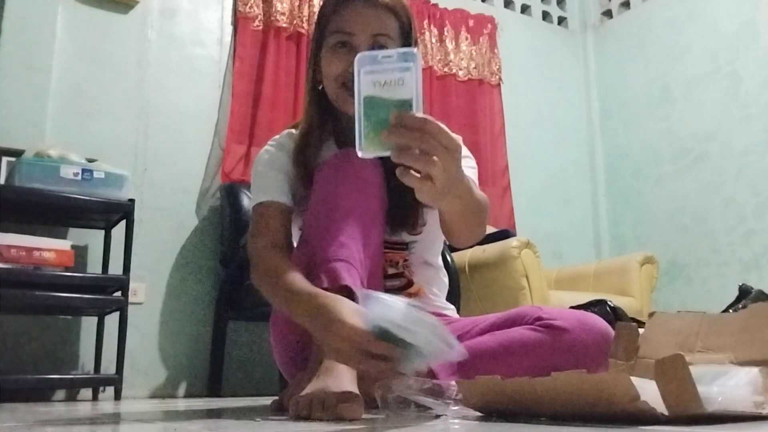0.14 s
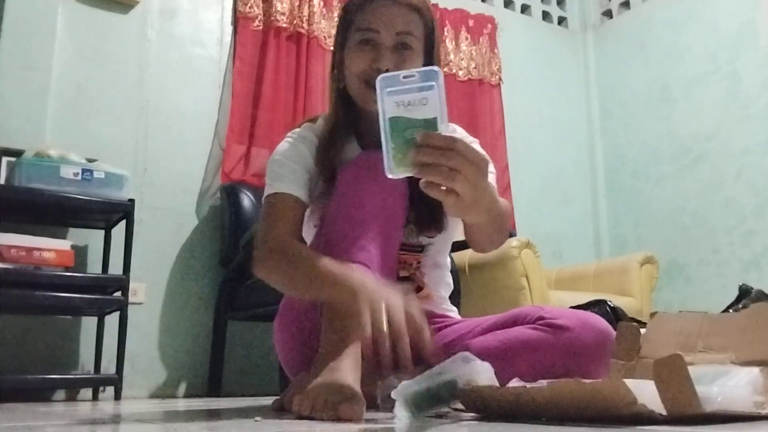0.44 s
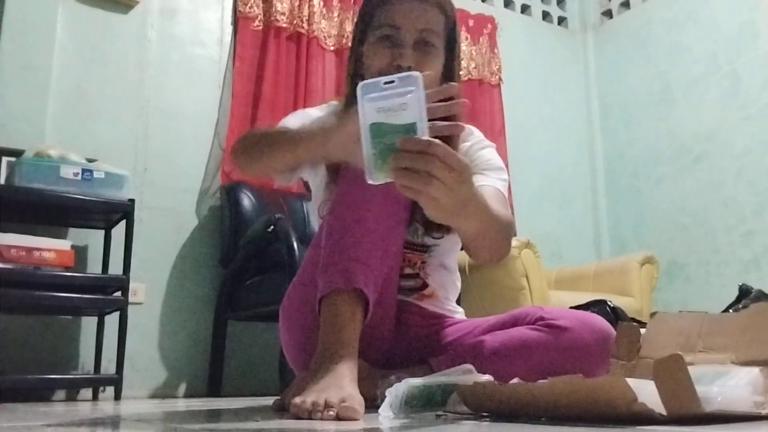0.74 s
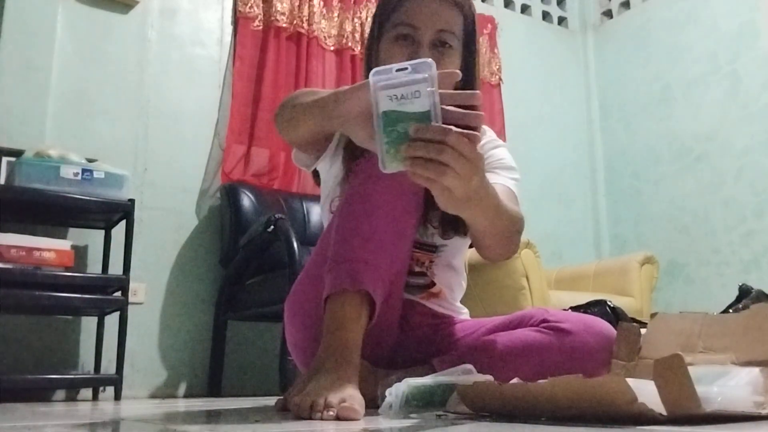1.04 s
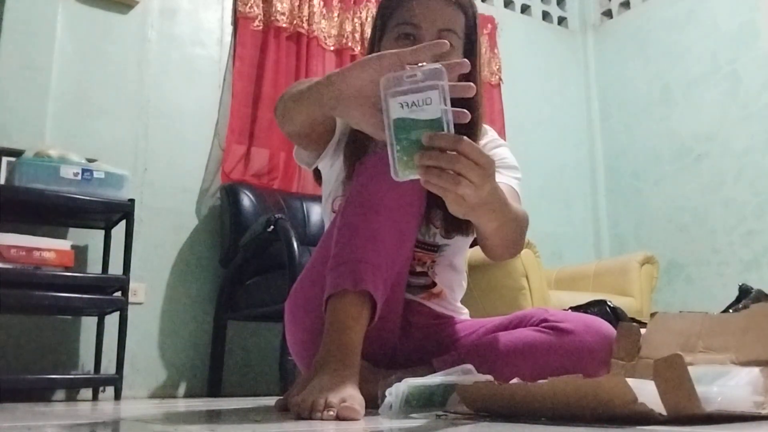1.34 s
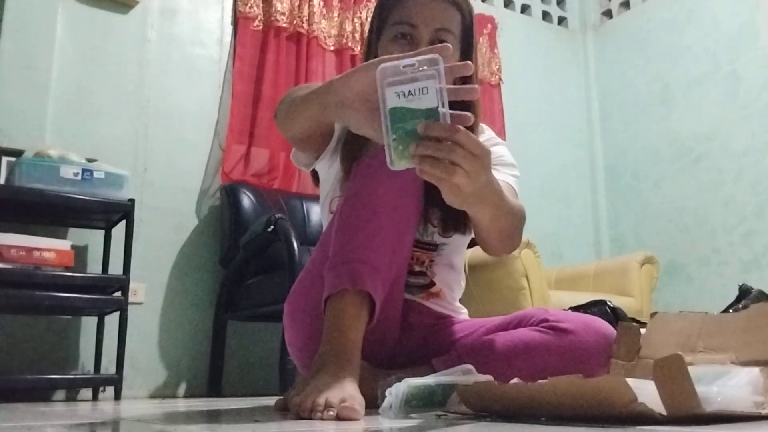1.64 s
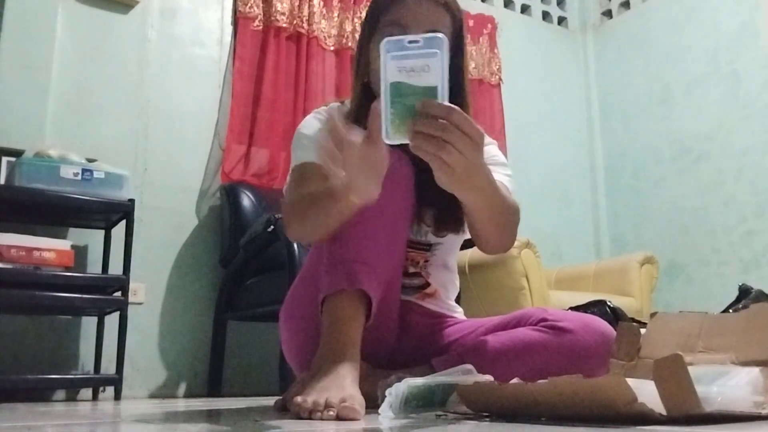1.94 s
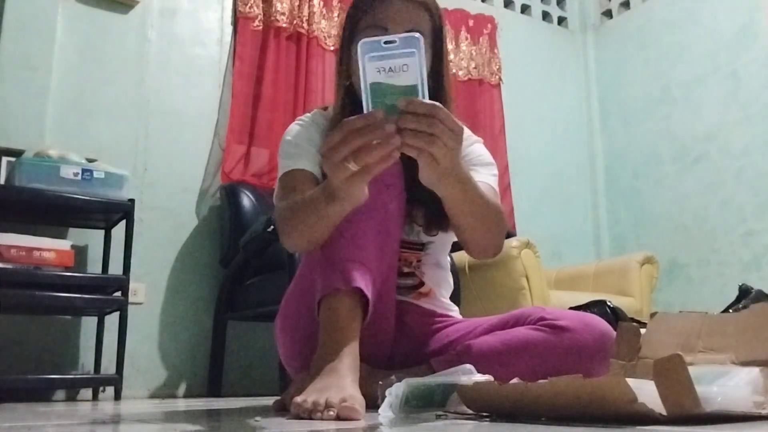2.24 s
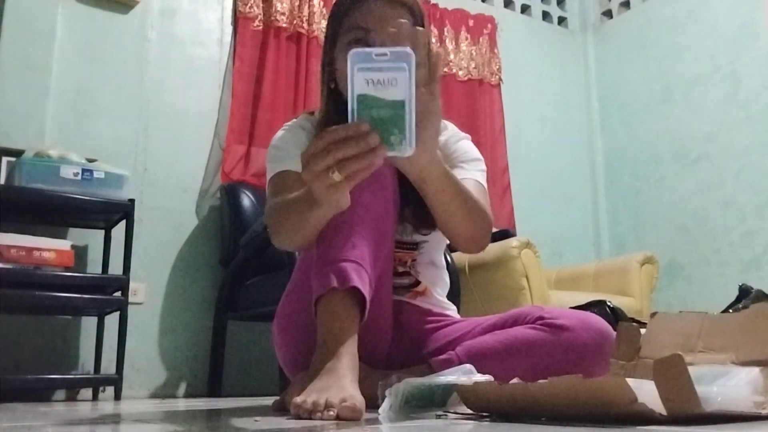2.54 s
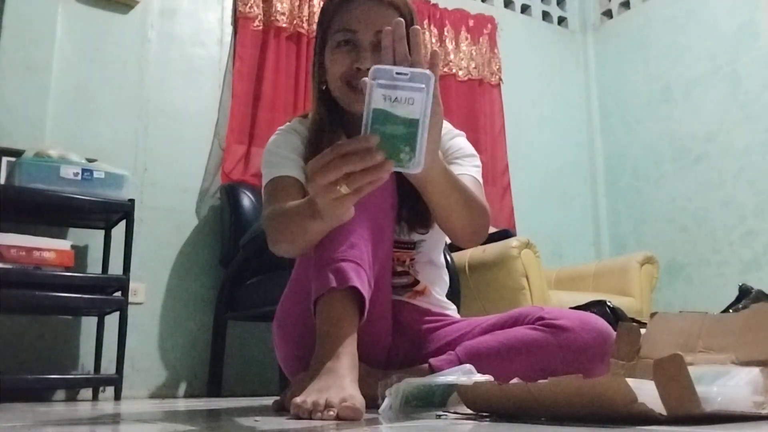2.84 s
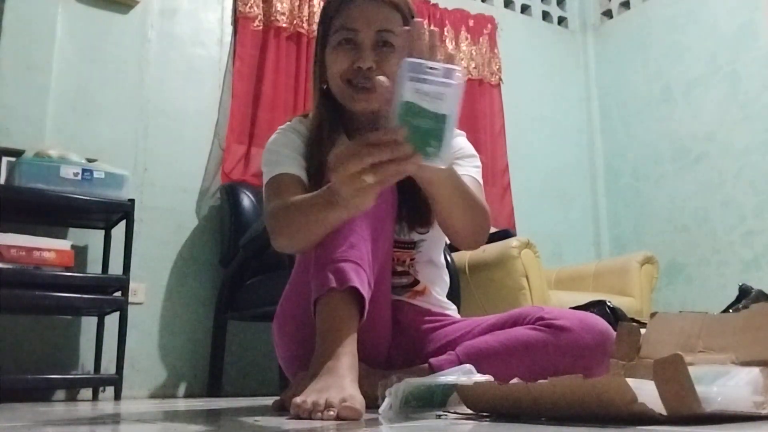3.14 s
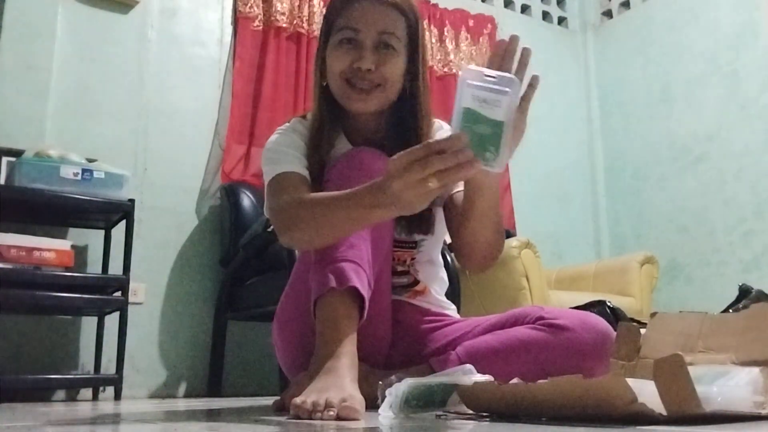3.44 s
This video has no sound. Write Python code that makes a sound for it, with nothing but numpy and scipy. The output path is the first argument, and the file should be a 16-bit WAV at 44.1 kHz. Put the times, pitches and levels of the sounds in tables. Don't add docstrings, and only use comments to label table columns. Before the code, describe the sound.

A plastic wrapper drops and crackles briefly on the floor while a cricket chirps steadily nearby.

```python
import sys
import numpy as np
from scipy import signal
from scipy.fft import rfft, irfft
from scipy.io import wavfile
from scipy.ndimage import uniform_filter1d

SR = 44100
rng = np.random.default_rng(int(sys.argv[2]) if len(sys.argv) > 2 else 0)


def linear_from_db(decibels):
    return 10 ** (np.asarray(decibels, float) / 20)


def wrap_up_sound(samples):
    columns = np.atleast_2d(samples).T
    tamed = np.clip(columns, -1, 1)
    steps = np.round(tamed * 32767).astype(np.int16)
    wavfile.write(sys.argv[1], SR, steps)


N = 158760

# (time [s], level [dB], share of full
STROKES = [(.065, -57, 0.85), (0.134, -57.5, 1.01), (0.225, -56, 0.95), (0.291, -66, 0.96),
           (0.749, -57.5, .7), (0.834, -56.5, 1.08), (0.912, -66, 0.97), (1.15, -60.5, 0.43),
           (1.226, -56.5, 0.84), (1.316, -57, 0.98), (1.392, -69, 1.2), (1.677, -60.5, 0.49),
           (1.753, -58, 0.99), (1.847, -57.5, 1.09), (1.927, -65.5, 0.96), (2.158, -57, .7),
           (2.239, -57, 1.07), (2.319, -65.5, 0.86), (2.572, -58, 0.67), (2.644, -59, 1.21),
           (2.734, -61.5, 0.84), (2.978, -58, 0.65), (3.054, -54.5, 0.96), (3.139, -72, 0.96),
           (3.401, -58, 0.67), (3.479, -56, 1.01), (3.570, -55.5, 0.83),
           (0.449, -79, 1),
    (0.55, -59, 0.98),
    (0.659, -62, 0.7),
    (1.06, -66.5, 0.87),
    (1.622, -76, 0.38),
    (2.09, -63.5, 0.57),
    (2.513, -70, 0.6),
    (2.916, -68, 0.44),
    (3.331, -72, 0.43),
]
# (left [Hz], right [Hz], width [Hz], level [dB])
STANDING_WAVES = [
    (3014, 2980, 22.5, 9),
    (2860, 2900, 60, 1),
    (3350, 4900, 20, -13),
]
# (frequency [Hz], level [dB])
WING_BAND = [(2300, -28), (2640, -13), (2760, -6), (3250, -2.5), (3380, -13), (3600, -58)]
# (time [s], peak [dB], pitch [Hz], treble [dB])
SNAPS = [(0.198, -51, 1960, -25), (.214, -54, 2280, -25), (.244, -38.5, 2860, -18), (.275, -37, 5560, -10),
         (.283, -34, 2940, -20), (0.361, -36.5, 3330, -2), (0.373, -38.5, 2960, 10), (.375, -46, 4000, -12),
         (0.382, -38, 1800, -10), (.390, -39, 2230, -12), (0.395, -24, 2450, 8.5),
         (0.3954, -13.5, 3710, -20), (0.396, -17, 2850, 2), (0.3983, -30, 2230, 6),
         (0.3999, -23.5, 3100, 2), (0.407, -38, 3300, -25), (0.4124, -53, 2660, -15),
         (0.439, -39, 1430, -15), (0.467, -36, 1300, -14), (.474, -21.5, 4050, -8),
         (0.475, -21.5, 3000, -2), (.492, -37, 3000, -8), (.512, -31, 4400, -3), (.5501, -31.5, 2870, -15),
         (.5515, -34, 2600, -17), (.553, -30, 2740, -17), (.566, -36, 1990, -16), (.608, -28.5, 2450, 6.5),
         (0.628, -34, 1990, -15), (.634, -35, 1680, -15), (0.645, -32, 2300, 7), (0.6474, -28.5, 2440, -10),
         (.650, -31, 1780, -10), (0.6594, -35, 1870, 1), (.663, -43, 2200, -6), (2.176, -39.5, 2210, -40),
         (2.1762, -46, 1500, -40), (2.336, -47, 1980, -29)]
# (time [s], peak [dB], pitch [Hz], T60
# [s])
KNOCKS = [(.283, -52.5, 890, 0.018), (.370, -42, 735, 0.021), (.3745, -38.5, 834, .04),
          (.378, -45, 297, 0.065), (0.3955, -18, 1164, 0.01), (.396, -29, 760, 0.027),
          (.396, -28.5, 1680, 0.029), (.397, -38, 560, 0.028), (0.398, -35, 307, 0.032),
          (.412, -37.5, 470, 0.023), (.464, -42.5, 1243, 0.036), (0.4752, -40.5, 1450, 0.032),
          (.475, -43.5, 295, 0.092), (.551, -44.5, 628, 0.037), (0.609, -33.5, 785, .018),
          (0.609, -35, 263, 0.02), (0.647, -42.5, 195, 0.036), (0.65, -49, 1270, 0.019),
          (0.671, -51.5, 380, 0.087), (0.693, -53, 323, 0.034), (.748, -46.5, 320, 0.054),
          (.752, -48, 510, 0.031), (.795, -44, 327, 0.03), (0.809, -50, 455, 0.083),
          (1.033, -50, 470, 0.028), (2.186, -59, 1090, 0.052), (.7, -50, 800, 0.036)]
# (time [s], level [dB])
HANDLING = [
    (.35, -73),
    (0.366, -45),
    (.4, -49.5),
    (.53, -47.5),
    (.59, -55.5),
    (.64, -46.5),
    (.7, -54),
    (.8, -63.5),
    (1.05, -69.5),
]
# (time [s], level [dB])
SETTLING = [
    (.36, -74),
    (.4, -73),
    (.6, -86),
    (.7, -76),
    (.76, -70),
    (.82, -68),
    (0.879, -70),
]
# (frequency [Hz], level [dB])
FILM = [(88, -45), (150, -5), (221, -1.5), (312, 0.5), (612, -2), (1600, -2.5), (2920, -5), (5300, -11),
        (10600, -7.5), (15000, -31)]
# (frequency [Hz], level [dB])
LEAN = [(200, -2), (500, -2), (1200, 1.6), (4000, -1.5), (8000, 1), (14000, 3)]
# (start [s], length [s], level [dB])
FAR_CALLS = [
    (-.02, 0.11, -77),
    (0.183, 0.081, -67),
    (1.415, 0.15, -72.5),
    (1.743, 0.097, -72),
    (2.162, 0.089, -77),
    (2.34, 0.053, -80),
    (2.575, 0.075, -70),
    (2.797, 0.087, -71),
    (3.018, 0.17, -78),
    (3.244, 0.2, -79),
]
# (throbs per s [Hz], first throb [s], depth [dB], left [dB], right [dB])
CHORUS = [
    (4.6, 0.0029, 4.5, -65, -61.5),
    (6.51, 0.061, 8, -66.5, -60),
    (0.0044, 0, 0, -59, -65.5),
]
# (frequency [Hz], width [Hz], level [dB])
WINGS = [
    [(6400, 350, -1), (6750, 320, 0)],
    [(7300, 220, -3), (7720, 260, 0), (8080, 300, -2), (8550, 350, -1)],
    [(9400, 450, 0), (10000, 600, -4), (8900, 400, -5)],
]
# (frequency [Hz], rms [dB])
BUZZ = [(12310, -93), (12720, -90), (12925, -87), (13168, -82), (13194, -84), (13399, -83), (13604, -81),
        (13792, -77), (14002, -80), (14212, -81), (14438, -84), (14643, -83), (14923, -87), (15057, -86),
        (15267, -88), (15698, -89)]
# (frequency [Hz], level [dB])
BUZZ_HISS = [(10900, -24), (11700, -32), (12100, -16), (13000, -4), (13700, -2), (15000, -2), (15700, 0)]
# (frequency [Hz], level [dB])
AIR = [(10, 8), (32, -5.5), (100, -13.5), (400, -24.5), (1200, -35.5), (2600, -40), (3550, -46.5),
       (4200, -42.5), (12000, -49)]


def evened(x):
    return x / np.sqrt(np.mean(x ** 2) + 1e-20)


def shaped(x, points):
    f_hz, db = np.transpose(points)
    hz = np.fft.rfftfreq(x.shape[-1], 1 / SR)
    gain = linear_from_db(np.interp(np.log(hz + 1), np.log(f_hz + 1), db))
    return irfft(rfft(x) * gain, x.shape[-1])


def add(mix, s, sound):
    at = round(s * SR)
    part = mix[max(at, 0):][:len(sound) + min(at, 0)]
    part += sound[max(-at, 0):][:len(part)]


def resonate(x, hz, width_hz):
    turn = np.exp(2j * np.pi * hz * np.arange(x.shape[-1]) / SR)
    r = np.exp(-np.pi * width_hz / SR)
    return 2 * (turn * signal.lfilter([1 - r], [1, -r], x / turn)).real


def resonate_twice(x, hz, width_hz, second_width_hz):
    return resonate(resonate(x, hz, width_hz), hz, second_width_hz)


def gain_over_time(points):
    s, db = np.transpose(points)
    return linear_from_db(np.interp(np.arange(N) / SR, s, db, -120, -120))


def room(x, t60_s, gap_s):
    slots = np.arange(0, SR, 20)
    at = slots + rng.integers(0, 20, (2, len(slots)))
    taps = np.zeros((2, SR))
    np.put_along_axis(taps, at, rng.choice([-1., 1.], (2, len(slots))), 1)
    t = np.arange(SR) / SR
    taps *= linear_from_db(-60 * t / t60_s) * np.clip(t / gap_s, 0, 1)
    return signal.fftconvolve(x[None], taps / np.linalg.norm(taps[0]), axes=1)[:, :N]


def cricket():
    wing_hz, sweep_hz = 2963, 579
    stroke_s, lead_s, short_share = .085, .05, .65
    wing = np.zeros(N)
    rough = 1 + 0.7 * evened(uniform_filter1d(rng.standard_normal(N), 70))
    for s, db, share in STROKES:
        length_s = stroke_s * (short_share + (1 - short_share) * share)
        u = np.arange(0, length_s, 1 / SR) / length_s
        hz = wing_hz + sweep_hz * share * (.5 - u)
        swell = np.sin(np.pi * u ** 1.29) ** 0.42
        tone = np.sin(2 * np.pi * np.cumsum(hz) / SR)
        add(wing, s - lead_s * length_s / stroke_s, linear_from_db(db) * swell * tone)
    wing = wing * rough
    standing = np.array([sum(linear_from_db(row[3]) * resonate(wing, row[ear], row[2]) for row in STANDING_WAVES)
                         for ear in range(2)])
    heard = linear_from_db(-8.5) * wing + standing + linear_from_db(7) * room(wing, 0.5, 0.0016)
    neighbours = linear_from_db(-74) * evened(shaped(rng.standard_normal((2, N)), WING_BAND))
    return shaped(heard, WING_BAND) + neighbours


def snaps():
    rise_s, burst_s, level_db, treble_hz = 0.00031, 0.0006, -2.5, 7300
    out, u = np.zeros(N), np.arange(1400) / SR
    for s, db, hz, treble_db in SNAPS:
        slips = rng.standard_normal(len(u)) + 0.4 * np.sin(2 * np.pi * hz * u)
        slips = slips * np.minimum(u / rise_s, 1) * np.exp(-u / burst_s)
        body = resonate_twice(slips, hz, 0.72 * hz, 1.05 * hz)
        treble = resonate(slips, treble_hz, 3400)
        snap = body / abs(body).max() + linear_from_db(treble_db) * treble / abs(treble).max()
        add(out, s, linear_from_db(db + level_db) * snap)
    return out


def knocks():
    out, u = np.zeros(N), np.arange(4000) / SR
    for s, db, hz, t60_s in KNOCKS:
        rise = np.minimum(u / 0.0012, 1)
        add(out, s, linear_from_db(db - 60 * u / t60_s) * rise * np.sin(2 * np.pi * hz * u))
    return out


def crackle():
    per_s, spread_db, crease_q, clump_db, clump_s = 600, 3.5, 2.5, 3.5, .02
    out = 0
    for hz in np.geomspace(200, 13000, num=12):
        size = linear_from_db(spread_db * np.minimum(rng.exponential(1, N), 3))
        ticks = size * (rng.random(N) < per_s / SR)
        drift = uniform_filter1d(rng.standard_normal(N), round(clump_s * SR))
        clump = linear_from_db(clump_db * evened(drift))
        sign = np.sign(rng.standard_normal(N))
        ring = signal.lfilter(*signal.iirpeak(hz, crease_q, SR), ticks * clump * sign)
        out = out + evened(ring) * np.sqrt(hz)
    return out


def wrapper():
    hollow_hz, port_lag_samples = 320, 1
    creases = crackle()
    effort = linear_from_db(0.1) * gain_over_time(HANDLING)
    rustle = effort * evened(shaped(creases, FILM))
    rocking = gain_over_time(SETTLING) * evened(resonate_twice(creases, hollow_hz, 220, 510))
    out = snaps() + knocks() + rustle + rocking
    both = np.array([np.roll(out, port_lag_samples), out]) + linear_from_db(-7.5) * room(out, 0.33, 0.00074)
    far_end = effort * evened(shaped(np.roll(creases, N // 2), FILM))
    far_end = far_end + signal.lfilter([.1], [1, -.9], np.roll(out, 9))
    both = both + linear_from_db(-1.5) * far_end * np.array([[.5], [-.5]])
    return np.array([shaped(both[0], LEAN), shaped(both[1], np.multiply(LEAN, [1, -1]))])


def teeth():
    clicks_per_s = 1200
    return rng.standard_normal((2, N)) * (0.27 + (rng.random((2, N)) < clicks_per_s / SR))


def far_cricket():
    hz, width_hz, t60_s, rise_s = 4860, 860, 0.34, 0.18
    t, level = np.arange(N) / SR, np.full(N, linear_from_db(-79.0))
    for s, length_s, db in FAR_CALLS:
        tail_s = np.maximum(t - s - length_s, 0)
        level = level + linear_from_db(db - 60 * tail_s / t60_s) * np.clip((t - s) / rise_s, 0, 1)
    return level * evened(resonate_twice(teeth(), hz, width_hz, width_hz))


def chorus():
    rise_share, ears_same = 0.36, 0.1
    t, out = np.arange(N) / SR, 0
    for (rate_hz, first_s, depth_db, left_db, right_db), wings in zip(CHORUS, WINGS):
        u = (t - first_s) * rate_hz % 1
        ramp = np.minimum(u / rise_share, (1 - u) / (1 - rise_share))
        throb = uniform_filter1d(ramp, 600) - .5
        drive, tone = teeth()[0], 0
        for hz, width_hz, db in wings:
            ring = resonate_twice(np.roll(drive, int(hz)), hz, width_hz, 1.9 * width_hz)
            tone = tone + linear_from_db(db) * evened(ring)
        pair = evened(np.array([tone, ears_same * tone + np.roll(tone, N // 2)]))
        out = out + pair * linear_from_db(depth_db * throb) * linear_from_db(np.array([[left_db], [right_db]]))
    return out


def buzzer():
    width_hz, level_db, lean_max_db, mid_hz, hiss_db = 22, 7.5, 3, 13900, -61.5
    drive, out = rng.standard_normal((2, N)), 0
    for hz, db in BUZZ:
        lean_db = lean_max_db * np.tanh((mid_hz - hz) / 500) * np.array([[1], [-1]])
        line = evened(resonate_twice(drive, hz, width_hz, 40))
        out = out + linear_from_db(db + level_db + lean_db) * line
    hiss = shaped(rng.standard_normal((2, N)), [(9000, -70)] + BUZZ_HISS)
    return out + linear_from_db(hiss_db) * evened(hiss)


def air():
    same = 0.09
    a, b = rng.standard_normal((2, N))
    right = same * a + np.sqrt(1 - same ** 2) * b
    pair = np.array([linear_from_db(0.44) * a, linear_from_db(-0.16) * right])
    return linear_from_db(-48.5) * evened(shaped(pair, AIR))


def scene():
    return cricket() + wrapper() + far_cricket() + chorus() + buzzer() + air()


def band_limit(x):
    return signal.sosfilt(signal.butter(12, 16460, fs=SR, output="sos"), x)


def record(dry):
    edge = signal.firwin(1501, 15735, window=("kaiser", 6), fs=SR)
    mix = signal.oaconvolve(dry, edge[None], "same")
    return band_limit(mix)


dry = scene()
out = record(dry)
wrap_up_sound(out)
```